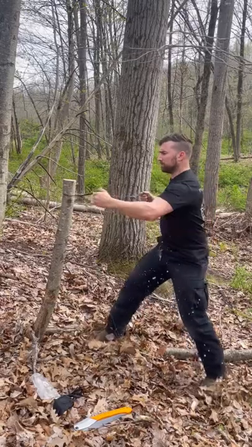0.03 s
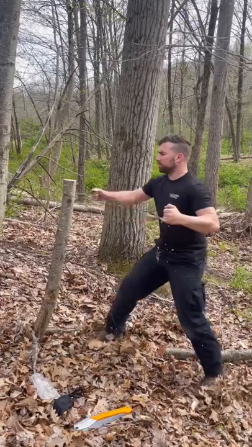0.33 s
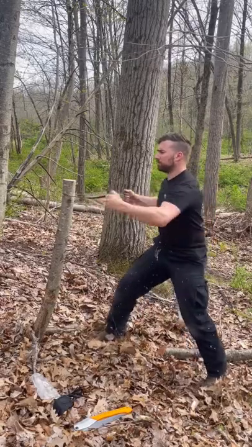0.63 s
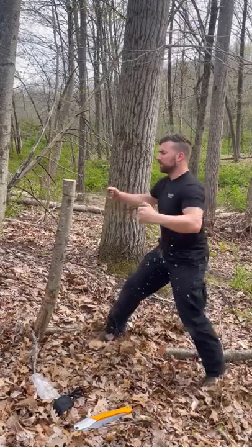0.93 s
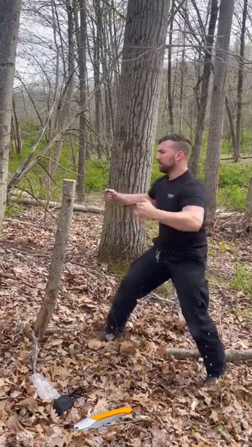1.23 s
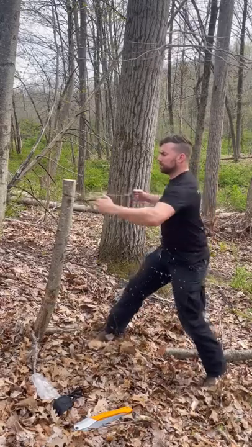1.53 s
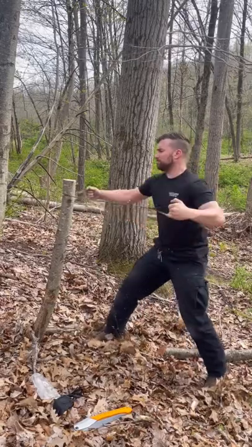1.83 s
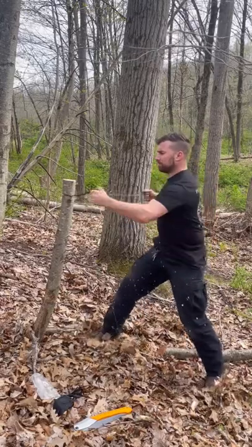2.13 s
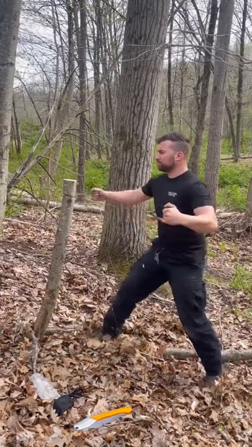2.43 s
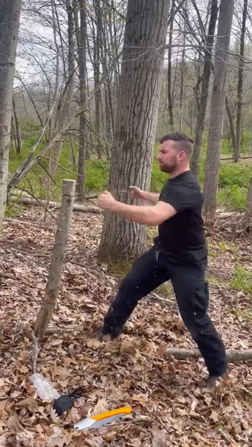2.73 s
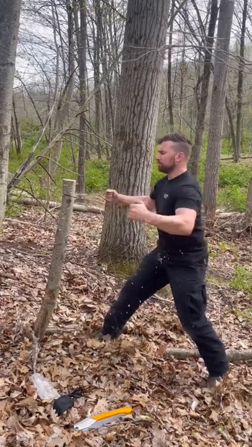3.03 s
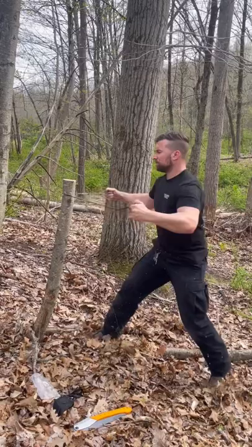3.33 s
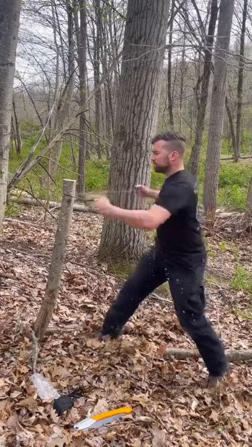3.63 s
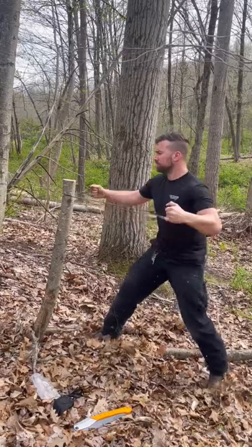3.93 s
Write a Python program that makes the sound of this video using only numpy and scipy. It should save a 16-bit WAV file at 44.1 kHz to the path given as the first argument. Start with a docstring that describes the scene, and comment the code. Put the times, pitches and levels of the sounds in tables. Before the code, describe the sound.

A hand-pulled saw chain rasps quickly back and forth through a thin trunk, nearly four strokes a second. Steel links jingle, fibres snap and the wood knocks dully, then rings more hollowly, over a low outdoor rumble.

```python
"""A toothed saw chain with two grips is pulled to and fro round a thin standing trunk in a wood, nearly
four strokes a second, over a low outdoor rumble. From the start, teeth drum at a rate that follows the
pull, rasp and tear fibres; steel links jingle, the trunk knocks at some turns, thick fibres snap.
From 1 s the slackening chain also clinks. From about 2 s the deepening cut brings up a hollow ring
of the trunk, and the teeth catch three times."""
import sys
import numpy as np
from scipy import signal
from scipy.fft import rfft, irfft
from scipy.io import wavfile

SR = 44100
rng = np.random.default_rng(int(sys.argv[2]) if len(sys.argv) > 2 else 0)


def int16_out(signal):
    """Quantize to a 16-bit WAV file."""
    q = np.round(np.clip(np.atleast_2d(signal).T, -1, 1) * 32767)
    wavfile.write(sys.argv[1], SR, q.astype(np.int16))


N = 176400
FILTER_SIZE = 8192
TIME_S, CONTROL_S = np.arange(N) / SR, np.arange(0, N / SR + .002, .001)
BINS_HZ = np.maximum(np.fft.rfftfreq(FILTER_SIZE, 1 / SR), 1)

# Pulls. Each row: fastest moment in s, length in s, top tooth rate in Hz, drum in dB, thud in dB,
# hardest press in s, scrape before and after it in s, rasp in dB, deepest bite in s, tear in dB,
# links in dB.
PULLS = [(-.08, .27, 340, -33, -44, -.08, .15, .15, -40, -.08, -40, -45),
         (.185, .28, 342, -40, -42, .165, .13, .17, -41.5, .156, -34, -45),
         (.45, .24, 352, -34, -42, .448, .23, .115, -43, .446, -37, -45),
         (.712, .27, 305, -38, -46, .707, .15, .14, -42.5, .692, -39, -45),
         (.992, .24, 335, -33, -40, .994, .16, .105, -41, .979, -34, -42),
         (1.245, .27, 330, -37, -45, 1.247, .15, .13, -40.5, 1.226, -37, -45),
         (1.51, .23, 362, -30, -43, 1.506, .136, .116, -39, 1.495, -37, -43),
         (1.775, .26, 348, -41, -46, 1.762, .134, .165, -41, 1.751, -40, -44),
         (2.04, .22, 370, -44, -42, 2.066, .23, .072, -39.5, 2.04, -38, -43),
         (2.295, .26, 250, -44, -43, 2.295, .148, .102, -40, 2.288, -43, -44),
         (2.575, .23, 342, -34, -42, 2.578, .17, .095, -39.5, 2.566, -45, -44),
         (2.82, .24, 360, -44, -42, 2.84, .17, .08, -41, 2.816, -42, -45),
         (3.085, .22, 412, -39, -44, 3.091, .15, .081, -38, 3.079, -38, -43),
         (3.345, .22, 450, -37, -42, 3.343, .155, .112, -41.5, 3.321, -44, -45),
         (3.605, .24, 400, -41, -41, 3.622, .156, .091, -39, 3.612, -42, -43),
         (3.87, .28, 380, -45, -39, 3.89, .17, .11, -40.5, 3.881, -43, -45)]
(FASTEST_S, LENGTH_S, TOP_HZ, DRUM_DB, THUD_DB, PRESS_S,
 BEFORE_S, AFTER_S, RASP_DB, BITE_S, TEAR_DB, LINKS_DB) = np.transpose(PULLS)
HALF_S = LENGTH_S / 2
# Spectrum of breaking fibres. Each row: frequency in Hz, level in dB.
FIBRE_SPECTRUM = [(600, -15), (1300, -5.5), (1650, -7), (2000, -4), (2400, -2), (2800, 2), (3100, -1.5),
                  (3400, -2.5), (3750, -4), (4400, -4.5), (5400, -8.5), (6500, -16), (10000, -23),
                  (15000, -32)]


def from_db(db):
    return 10 ** (np.asarray(db) / 20)


def unit_rms(x):
    return x / np.sqrt(np.mean(x ** 2) + 1e-20)


def at_samples(control):
    return np.interp(TIME_S, CONTROL_S, control)


def at_bins(points):
    """Interpolate a table over log frequency."""
    hz, value = np.transpose(points)
    return np.interp(np.log(BINS_HZ), np.log(hz), value)


def filtered(x, response):
    """Apply a frequency response without delay."""
    kernel = np.roll(irfft(response), FILTER_SIZE // 2) * np.hanning(FILTER_SIZE)
    return signal.oaconvolve(x, kernel)[FILTER_SIZE // 2:][:N]


def coloured(x, spectrum):
    """Minimum-phase filter; keeps white-noise power."""
    cepstrum = irfft(np.log(unit_rms(from_db(at_bins(spectrum)))))
    cepstrum[1:FILTER_SIZE // 2] *= 2
    cepstrum[FILTER_SIZE // 2 + 1:] = 0
    return filtered(x, np.exp(rfft(cepstrum)))


def resonate(x, hz, width_hz):
    """Band-pass; keeps white-noise power."""
    sos = signal.butter(2, [hz - width_hz / 2, hz + width_hz / 2], "band", fs=SR, output="sos")
    return signal.sosfilt(sos, x + 1e-18) * np.sqrt(SR / 2 / width_hz)


def drift(rate_hz):
    """Smooth random control, unit RMS."""
    pole = np.exp(-2 * np.pi * rate_hz * CONTROL_S[1])
    noise = rng.standard_normal(len(CONTROL_S))
    return at_samples(unit_rms(signal.lfilter([1], [1, -2 * pole, pole * pole], noise)))


def grains(per_s, spread_db):
    """Random uneven clicks, unit RMS."""
    sizes = from_db(spread_db * np.minimum(rng.exponential(1, N), 4)) * rng.choice([-1, 1], N)
    return unit_rms(sizes * (rng.random(N) < per_s / SR))


def decay(strikes, decay_s):
    return signal.lfilter([1], [1, -np.exp(-1 / (decay_s * SR))], strikes + 1e-18)


def bursts(events, decay_s, rise_s):
    """One noise burst per event."""
    strikes = np.zeros(N)
    for start_s, db in events:
        strikes[int(start_s * SR)] += from_db(db) / 2
    return (decay(strikes, decay_s) - decay(strikes, rise_s)) * rng.standard_normal(N)


def arch(peak_s, rise_s, fall_s):
    """Speed of one pull: half a cosine, rest to rest."""
    position = (CONTROL_S - peak_s) / np.where(CONTROL_S < peak_s, rise_s, fall_s)
    return np.cos(np.pi / 2 * np.clip(position, -1, 1)).clip(0)


def swell(peak_s, rise_s, fall_s, level_db, exponent):
    """Gain over all pulls, as a power of speed."""
    pulls = np.broadcast(peak_s, rise_s, fall_s, level_db)
    return at_samples(sum(from_db(db) * arch(*timing) ** exponent for *timing, db in pulls))


def tooth_count():
    """Teeth passed so far; the rate follows the pull, with jitter."""
    rates_hz = [hz * arch(at, half, half) ** 1.2 for at, half, hz in zip(FASTEST_S, HALF_S, TOP_HZ)]
    tooth_hz = at_samples(np.max(rates_hz, axis=0))
    return np.cumsum(tooth_hz * (1 + .06 * drift(90))) / SR


def drum(teeth, overtone_db=-24, flutter_db=3, lag_s=.007):
    """Teeth drum on the trunk, whose shaking lags the pull."""
    tone = np.sin(2 * np.pi * teeth) + from_db(overtone_db) * np.sin(4 * np.pi * teeth)
    gain = swell(FASTEST_S + lag_s, HALF_S, HALF_S, DRUM_DB, exponent=1.6)
    return unit_rms(tone * from_db(flutter_db * drift(45))) * gain


def tooth_force(teeth, uneven_db=4.6, drag=.75):
    """Each tooth bites with its own force, over a steady drag."""
    enters = np.diff(np.floor(teeth), prepend=0) > 0
    bites = enters * from_db(uneven_db * np.clip(rng.standard_normal(N), -2, 2))
    return unit_rms(unit_rms(decay(bites, decay_s=.0018)) + drag)


def thud():
    """The trunk thuds under each pull."""
    # Trunk spectrum. Each row: frequency in Hz, level in dB.
    spectrum = [(50, -20), (110, -3), (150, -3), (200, 1.5), (280, 0), (360, 0), (450, -4), (560, -12),
                (800, -22), (2000, -45)]
    gain = swell(FASTEST_S, BEFORE_S, HALF_S, THUD_DB, exponent=1.8)
    return coloured(grains(per_s=1500, spread_db=2.5) * gain, spectrum)


def rasp(force, idle_db=-56):
    """Teeth scrape along the cut."""
    # Scrape spectrum. Each row: frequency in Hz, level in dB.
    spectrum = [(250, -22), (520, -4), (700, -2), (900, -2), (1100, 1), (1420, -1), (1680, -7), (1950, -3),
                (2300, -5), (2800, -4), (3700, -12), (5000, -16), (15000, -40)]
    gain = swell(PRESS_S, BEFORE_S, AFTER_S, RASP_DB, exponent=2.1) + from_db(idle_db)
    return coloured(grains(per_s=12000, spread_db=2) * force * gain, spectrum)


def tear(force, half_bite_s=.135, idle_db=-58, swing_db=6, hiss_db=-1.2):
    """Tearing fibres hiss and ring in the cut, now in one mode, now in another."""
    # Modes of the cut. Each row: frequency in Hz, width in Hz, level in dB.
    modes = [(1900, 240, -23), (2800, 420, -14), (4390, 500, -19)]
    gain = swell(BITE_S, half_bite_s, half_bite_s, TEAR_DB, exponent=7) + from_db(idle_db)
    fibres = grains(per_s=16000, spread_db=2) * force * gain
    rings = sum(from_db(db + swing_db * np.tanh(drift(9))) * resonate(fibres, hz, width_hz)
                for hz, width_hz, db in modes)
    return rings + from_db(hiss_db) * coloured(fibres, FIBRE_SPECTRUM)


def chain(idle_db=-48.3):
    """Steel links knock together: a constant jingle, rattles and clinks when slack."""
    # Link spectrum. Each row: frequency in Hz, level in dB.
    spectrum = [(1500, -25), (3600, -10), (5100, 2), (6200, -1), (7400, -3), (8300, -2), (10000, -2),
                (12000, -5), (13500, -11.5), (15600, -6)]
    # Slack rattles. Each row: centre in s, half length in s, level in dB.
    rattles = [(.345, .02, -45), (.535, .012, -46), (.79, .018, -42), (1.3, .015, -45), (1.442, .01, -42),
               (1.575, .015, -44), (1.845, .015, -43), (1.935, .028, -39), (2.36, .018, -44),
               (3.2, .014, -44), (3.385, .012, -42), (3.79, .02, -46)]
    # Single clinks. Each row: start in s, level in dB.
    clinks = [(1.04, -28), (2.0782, -22), (2.4558, -29), (2.4892, -28), (2.607, -27), (2.8769, -29),
              (2.9841, -30), (3.1093, -20), (3.1373, -23), (3.5004, -26), (3.6361, -17), (3.6661, -19)]
    power = swell(FASTEST_S, rise_s=.16, fall_s=.13, level_db=LINKS_DB, exponent=1.6) ** 2
    power += from_db(idle_db) ** 2
    for centre_s, half_s, db in rattles:
        power += from_db(db) ** 2 * np.exp(-((TIME_S - centre_s) / half_s) ** 2)
    knocks = unit_rms(np.sqrt(decay(grains(per_s=1600, spread_db=2.6) ** 2, decay_s=.0011)))
    jingle = knocks * np.sqrt(power) * rng.standard_normal(N)
    return coloured(jingle + bursts(clinks, decay_s=.006, rise_s=.0009), spectrum)


def rumble(level_db=-44):
    """Steady low outdoor noise."""
    # Background spectrum. Each row: frequency in Hz, level in dB.
    spectrum = [(15, -50), (26, -38), (38, -19), (55, 1), (70, 1), (85, -6), (117, 1), (150, -10),
                (200, -9), (300, -17), (600, -24), (2000, -29), (15000, -42)]
    return from_db(level_db) * coloured(rng.standard_normal(N), spectrum)


def jolts(decay_s=.028):
    """The trunk knocks dully as the chain stops or starts."""
    # Knocks. Each row: start in s, level in dB, pitch in Hz.
    knocks = [(.003, -31, 175), (.104, -29, 185), (.53, -38, 135), (1.064, -27, 126), (1.875, -37, 110),
              (2.105, -36, 130), (2.89, -34, 135), (3.025, -35, 115), (3.435, -38, 105), (3.682, -36, 125)]
    track, age_s = np.zeros(N + SR), TIME_S[:SR // 4]
    for start_s, db, hz in knocks:
        start = int(start_s * SR)
        ring = np.sin(2 * np.pi * hz * age_s) * np.exp(-age_s / decay_s)
        track[start:start + len(ring)] += from_db(db) * ring
    return track[:N]


def snaps():
    """Thick fibres give way with a crack."""
    # Cracks. Each row: start in s, level in dB.
    cracks = [(.109, -19), (.174, -22), (.4284, -23), (.9432, -16), (.9772, -17), (.999, -18),
              (1.2017, -23), (1.496, -22), (1.556, -24), (1.708, -28), (1.872, -29), (2.5491, -26),
              (3.0455, -24)]
    return coloured(bursts(cracks, decay_s=.002, rise_s=.00005), FIBRE_SPECTRUM)


def hollow_ring():
    """The trunk rings more as the cut deepens."""
    # Trunk modes. Each row: frequency in Hz, width in Hz, level in dB.
    modes = [(430, 80, 0), (824, 120, -14), (1090, 200, -7.5)]
    # Growth of the ring. Each row: time in s, level in dB.
    growth = [(1.6, -52), (2.1, -43), (2.55, -44), (2.85, -39), (3.1, -41), (3.35, -35.5), (3.65, -43),
              (3.9, -42)]
    gain = swell(PRESS_S, BEFORE_S, AFTER_S, level_db=0, exponent=1.8)
    gain *= from_db(np.interp(TIME_S, *np.transpose(growth)))
    knocks = grains(per_s=2500, spread_db=1.5) * gain
    return sum(from_db(db) * resonate(knocks, hz, width_hz) for hz, width_hz, db in modes)


def catches():
    """Catching teeth shake the trunk in short rough bursts."""
    # Chatter. Each row: start in s, level in dB, pitch in Hz.
    chatter = [(2.33, -33, 490), (2.868, -28, 460), (3.345, -26, 440)]
    return sum(resonate(bursts([(start_s, db)], decay_s=.024, rise_s=.003), hz, width_hz=110)
               for start_s, db, hz in chatter)


def wood_echo(saw, send_db=-8, t60_s=.055, gap_s=.003, paths=3):
    """Ground and trunks scatter a short echo, different per ear, shifting as the saw moves."""
    # Echo tilt. Each row: frequency in Hz, gain in dB.
    tilt = [(100, -16), (400, -10), (900, -2), (6000, 1)]
    age_s = TIME_S[:SR // 8]
    echoes = rng.standard_normal((paths, 2, len(age_s))) * from_db(-60 * age_s / t60_s) * (age_s > gap_s)
    echoes /= np.linalg.norm(echoes, axis=-1, keepdims=True)
    shares = np.array([drift(3) for _ in echoes])
    shares /= np.linalg.norm(shares, axis=0)
    sent = filtered(saw, from_db(send_db + at_bins(tilt)))
    return sum(np.array([signal.oaconvolve(sent * share, ear)[:N] for ear in echo])
               for share, echo in zip(shares, echoes))


def microphones(x):
    """Two ports hear the sound with different phase and level."""
    # Port phase. Each row: frequency in Hz, lead of left in radians.
    phase = [(20, 0), (1800, 0), (2500, .8), (2950, .8), (3700, .2), (4400, .65), (4900, 0), (5400, .15),
             (7000, 3.1), (8150, 3.2), (10400, 6.25), (11600, 6.3), (13300, 9.4), (15000, 9.5),
             (16000, 10.5)]
    # Port balance. Each row: frequency in Hz, left minus right in dB.
    balance = [(60, 0), (130, .8), (330, 2.3), (750, 3), (1500, 0), (2100, 0), (3100, 2.4), (4200, -1),
               (5200, 0)]
    left = np.exp(.5j * at_bins(phase)) * from_db(at_bins(balance) / 2)
    return np.array([filtered(x, left), filtered(x, 1 / left)])


def scene():
    """Saw, rumble and echo in stereo."""
    teeth = tooth_count()
    saw = drum(teeth)
    force = tooth_force(teeth)
    saw += thud() + rasp(force) + tear(force) + hollow_ring()
    saw += snaps() + catches() + jolts() + chain()
    return microphones(saw + rumble()) + wood_echo(saw)


def record(dry):
    """Steep low-pass."""
    cutoff_hz = 15800
    response = 1 / np.sqrt(1 + (BINS_HZ / cutoff_hz) ** 400)
    return np.array([filtered(side, response) for side in dry])


dry = scene()
out = record(dry)
int16_out(out)
```